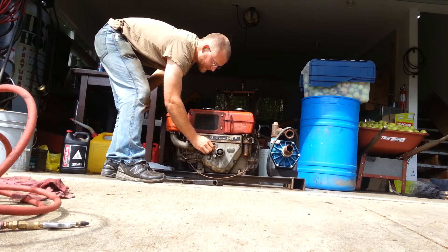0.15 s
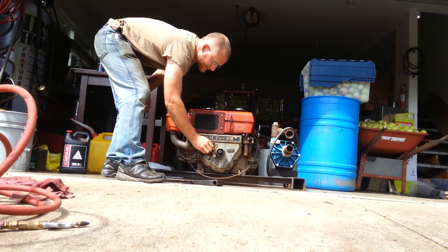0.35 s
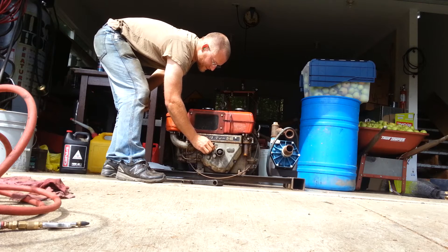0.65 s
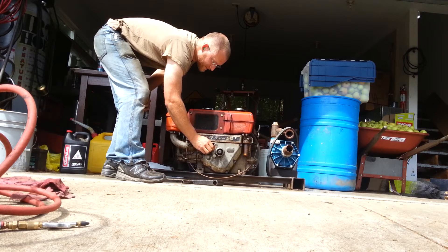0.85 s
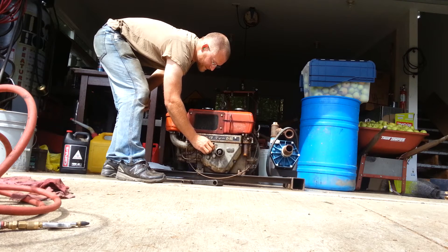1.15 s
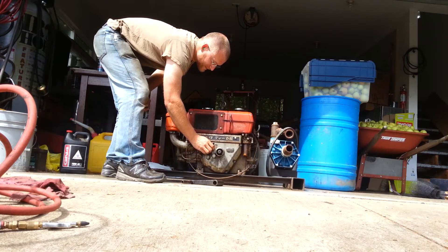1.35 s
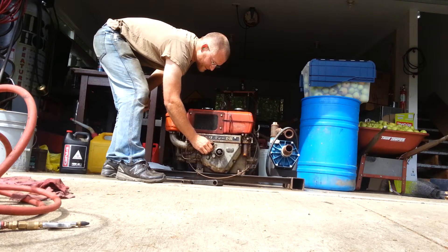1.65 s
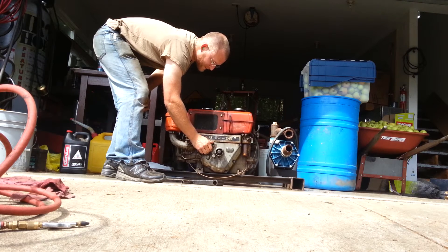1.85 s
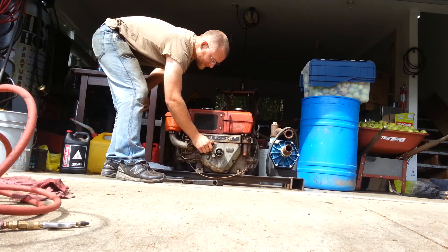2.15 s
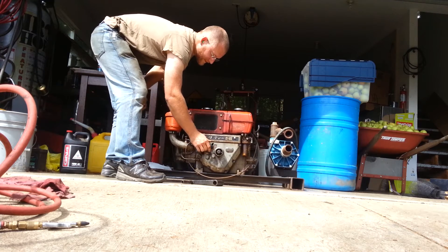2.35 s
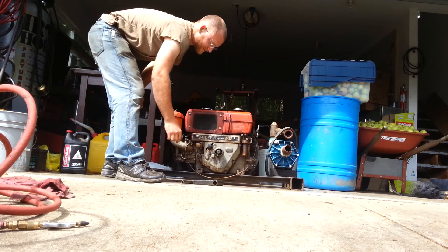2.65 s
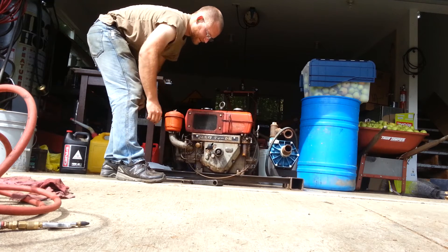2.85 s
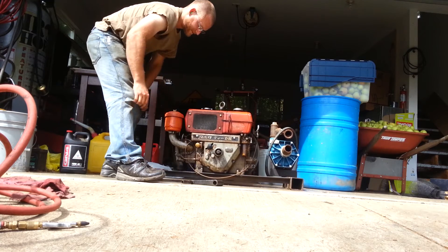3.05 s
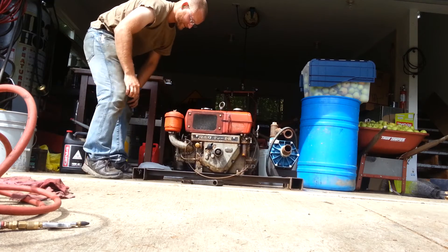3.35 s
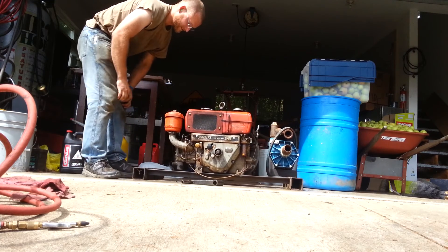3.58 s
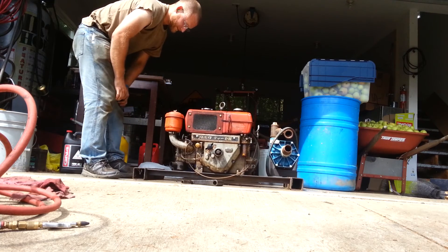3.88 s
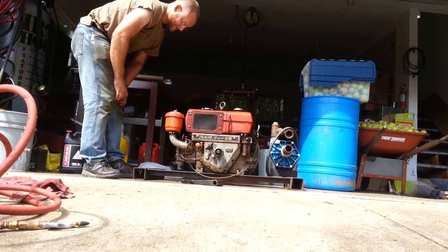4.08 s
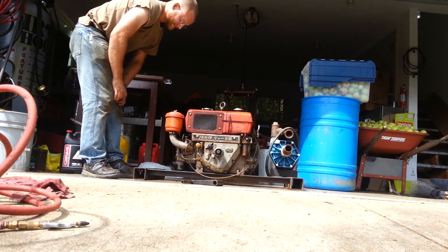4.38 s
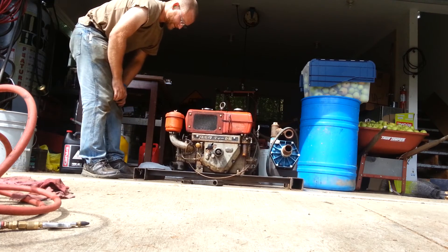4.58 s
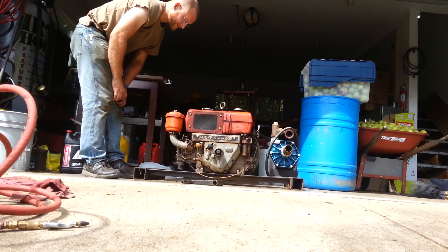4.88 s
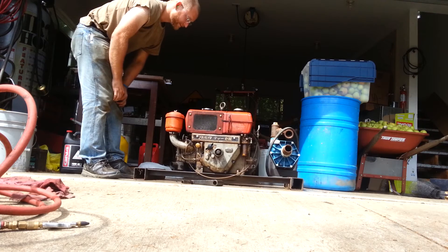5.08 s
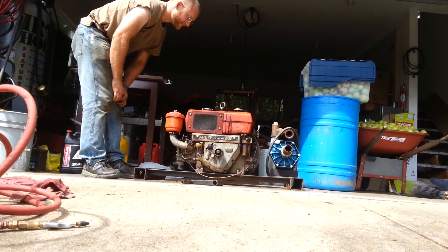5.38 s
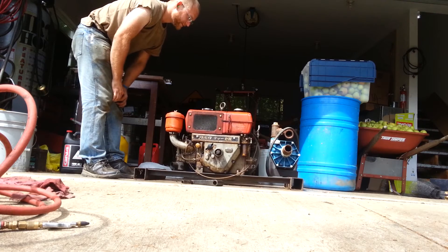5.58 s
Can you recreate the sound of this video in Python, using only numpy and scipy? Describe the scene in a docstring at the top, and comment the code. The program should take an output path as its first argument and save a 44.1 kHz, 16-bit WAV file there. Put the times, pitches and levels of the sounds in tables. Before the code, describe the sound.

An old single-cylinder diesel winds up in an open garage. After a brief churn of gears, the first firing comes almost at once; the opening two beats are weak, at roughly four and a half per second. By 0.5 s the strokes are strong: a dull, hard knock of the block, a hoarse low-mid exhaust blast, and a rough burst of steel skid and covers chattering. Between beats, gears churn, loose parts tick and the intake gives a small low gulp. The force dips near 1.2 s, surges around 1.7 s at about seven beats per second, and eases near 2.3 s. From about 2.7 s the exhaust pitch rises and the rattle grows longer and brighter, merging into a fast chug. After 3.8 s it eases slightly and runs steadily near nine beats per second to the end, around 5.7 s. Short garage reverberation, very faint wind, and overloaded, flattened peaks throughout.

```python
"""In an open garage, a one-cylinder diesel swung by a hand crank picks up from five to nine firings a second.
Each firing knocks the block, roars out of the exhaust and shakes the steel skid into chatter.
About half a cycle later the intake gulps; gears churn and loose parts tap in between.
The garage rings, faint wind rumbles outside, and the microphone overloads on the loud beats."""
import sys
import numpy as np
from scipy import signal
from scipy.fft import rfft, irfft
from scipy.io import wavfile

SR = 44100
rng = np.random.default_rng(int(sys.argv[2]) if len(sys.argv) > 2 else 0)


def unload_audio(sound):
    """Save the sound as a 16-bit wav file, at the path given as the first command line argument."""
    columns = np.transpose(np.atleast_2d(sound))
    # keep every value between -1 and 1, then stretch to whole-number steps
    steps = np.round(np.clip(columns, -1, 1) * 32767)
    wavfile.write(sys.argv[1], SR, steps.astype(np.int16))


N = 252252  # length of the scene [samples]
CYCLE = 10240  # room for the sound of one firing [samples]
AGE = np.arange(CYCLE) / SR  # time since a firing [s]
SIGN = np.array([[1], [-1]])  # left, right


# What the block rings with after the crack: (frequency [Hz], level [dB], time to fade by 60 dB [s])
BLOCK_MODES = [(403, -10, 0.032), (473, -15.5, 0.087), (688, -2, 0.037), (858, -10, 0.071),
               (1084, -6, 0.056), (1476, -18, 0.15), (1480, -47, 0.075)]
# Level of the knock: (level at the starting speed [dB], gain per extra firing a second [dB],
# added at full running [dB], gain per dB of force [dB/dB], added on the first stroke [dB], scatter [dB])
KNOCK_LEVEL = (-5, -.5, -3.5, .5, 3, 2.5)


def knocks():
    """Combustion strikes the block: a short crack, its echo, the ring of the casting and a thin tick."""
    out = np.zeros((2, N))
    crack = 0
    for at, db in [(.0013, -2.5), (.0088, -14.5)]:  # the crack, then its echo
        swell = np.exp(-.5 * ((AGE - at) / 0.00083) ** 2)
        crack = crack + undb(db) * swell * np.cos(2 * np.pi * 1450 * (AGE - at))

    push = signal.windows.hann(15)  # a blow this long softens the highest ringing
    block = signal.lfilter(push / push.sum(), 1, ring(BLOCK_MODES, CYCLE))
    # a small body radiates no bass
    block = signal.sosfilt(signal.butter(2, 260, "highpass", fs=SR, output="sos"), block)

    snap = np.exp(-AGE / .0045) * (1 - np.exp(-AGE / .0008))
    tick_spectrum = [(30, -35), (300, -39), (1500, -12), (3000, 6), (5500, -16.5),
                     (9000, -15.5), (13000, -20.0), (16000, -37)]  # (Hz, dB)
    for (s, _), grain in zip(firings(), cycles(memory=0.7)):
        blow = loudness(s, KNOCK_LEVEL)
        tick = snap * colour(grain, tick_spectrum)
        add(out, s, blow * undb(6.0) * crack)
        add(out, s + .0008, blow * tick)
        add(out, s + 0.00252, blow * block)
    return out


# Spectrum of the low roar: (frequency [Hz], level [dB per Hz])
ROAR_SPECTRUM = [(25, -16), (70, -25), (160, -31), (280, 0), (420, 3.5), (720, 6), (1100, 2.5), (2000, -29),
                 (5000, -22), (16000, -63)]
# Resonances of the exhaust's bark: (frequency [Hz], width [Hz], level [dB])
BARK_MODES = [(1092, 56, 7), (1470, 220, -24), (1622, 173, 17.5), (1880, 80, -45)]
# Levels of roar and bark: the same six columns and units as KNOCK_LEVEL
ROAR_LEVEL = (-11.5, 0.27, -1.8, .45, -5, 0.64)
BARK_LEVEL = (-17.8, 0.68, 5, 0.03, 4, 1.1)
PIPE_COLD_HZ, PIPE_HOT_HZ = 509, 629  # the pipe's pitch rises as it heats
PIPE_SCATTER = 0.042  # how far the pitch strays from beat to beat [share]
PIPE_WARM_S, PIPE_WARMING_S = 2.67, 0.16  # when it heats, and how quickly
VALVE_LAG_S = 0.003006  # the gas leaves a moment after the knock


def exhaust():
    """A blast of gas swells and fades in the pipe: a low roar and a bark above it, uneven from beat to beat."""
    out = np.zeros((2, N))
    swell = 1 - np.exp(-AGE / 0.0019)
    blast = swell / (1 + np.exp(np.minimum((AGE - .026) / 0.0053, 50)))
    blast_rms = np.sqrt(np.mean(blast ** 2))
    bark_spectrum = [(100, -11), (900, 5.5), (1800, -4.0), (2600, -9), (6000, -28), (16000, -50)]  # (Hz, dB)
    for (s, _), gas in zip(firings(), cycles(memory=0.66)):
        heat = .5 + .5 * np.tanh((s - PIPE_WARM_S) / PIPE_WARMING_S)
        pipe_hz = PIPE_COLD_HZ + heat * (PIPE_HOT_HZ - PIPE_COLD_HZ)
        pipe_hz = pipe_hz * (1 + PIPE_SCATTER * rng.standard_normal())
        roar = colour(gas, ROAR_SPECTRUM)
        roar = roar + undb(6) * resonate(roar, pipe_hz, 45)
        bark = sum(undb(db) * resonate(gas, hz, width) for hz, width, db in BARK_MODES)
        bark = colour(bark, bark_spectrum)
        for sound, law in (roar, ROAR_LEVEL), (bark, BARK_LEVEL):
            add(out, s + VALVE_LAG_S, loudness(s, law) * unit(sound * blast) * blast_rms)
    return out


# Spectra of the chatter while winding up and at full running: (frequency [Hz], level [dB per Hz])
CHATTER_SLOW_SPECTRUM = [(20, -54), (200, -4), (900, -3), (1600, -3.5), (2000, 3), (2450, 3), (3200, 7),
                         (3700, -4), (4700, -10.5), (5700, -32), (8500, -31), (12000, -62), (16000, -62)]
CHATTER_FAST_SPECTRUM = [(20, -77), (200, -4), (900, -6.5), (1600, -13), (2000, -3), (2450, 0.5), (3200, 5),
                         (3900, 1), (4700, -6), (5700, -17.5), (8500, -23), (12000, -36), (16000, -100)]
# Level of the chatter: the same six columns and units as KNOCK_LEVEL
CHATTER_LEVEL = (-7.5, 0.4364, -3, 1, -2.5, 1.15)
CHATTER_LAG_S, CHATTER_ANGLE = .0095, .066  # it peaks this lag plus this share of the cycle after the firing
CHATTER_SLOW_S, CHATTER_FAST_S = 0.0063, 0.0091  # half length of the burst, winding up and at full running
CHATTER_TAIL_DB, CHATTER_TAIL_LENGTHS = -12.5, 3.2  # last bounces: level, and decay in half lengths


def chatter():
    """Each firing sets skid and covers buzzing together; the burst grows longer and brighter with speed."""
    out = np.zeros((2, N))
    for (s, period), taps in zip(firings(), cycles(memory=0.82)):
        running = full_running(s)
        length = CHATTER_SLOW_S + running * (CHATTER_FAST_S - CHATTER_SLOW_S)
        t = (AGE - CHATTER_LAG_S - CHATTER_ANGLE * period) / length  # in half lengths from the peak
        bounces = undb(CHATTER_TAIL_DB) * np.exp(-np.maximum(t, 0) / CHATTER_TAIL_LENGTHS)
        onset = 1 / (1 + np.exp(np.minimum(-6 * (t + 1.3), 50)))  # sets in abruptly
        burst = np.maximum(np.exp(-.5 * t ** 2), bounces) * onset
        # the strength jumps at random every 64 samples
        taps = taps * undb(2.8 * np.repeat(rng.standard_normal(CYCLE // 64), 64))
        slow = unit(colour(taps, CHATTER_SLOW_SPECTRUM))
        fast = unit(colour(taps, CHATTER_FAST_SPECTRUM))
        buzz = (1 - running) * slow + running * fast
        add(out, s, loudness(s, CHATTER_LEVEL) * burst * buzz)
    return out


# What the skid and covers ring with: (frequency [Hz], level [dB], time to fade by 60 dB [s])
STEEL_MODES = [(414, -3, 0.05), (525.2, -5, 0.19), (642, -11, 0.037), (817, 1, 0.078), (890, -6.5, 0.25),
               (960, 0.5, 0.037), (1180, -12, 0.66), (1455, -10, 0.16), (1618, -3, 0.099),
               (2340, 2.5, 0.07), (2375, -8.5, 0.094), (2455, 6, 0.073), (2555, -4, 0.07), (2693, -4, 0.27),
               (2733, -6, 0.037), (3113, 0.5, 0.096), (3350, -11, 0.049), (3350, -18, 0.51),
               (3560, 3.5, 0.023), (3980, -10, 0.076), (3950, -1, 0.064), (4260, -10, 0.041),
               (4460, -4, 0.17), (4900, -13, 0.043)]


def steel(hits):
    """Skid and covers ring on in many decaying tones after whatever hits them."""
    return through(hits, ring(STEEL_MODES, 2 * CYCLE, scattered=True))


# Level of the intake: the same six columns and units as KNOCK_LEVEL
INTAKE_LEVEL = (-23.5, 2.5, 0.1, 0, -2.5, -0.7)
INTAKE_ANGLE = .535  # share of the cycle at which the intake gulps


def intake():
    """Once a cycle the intake gulps: a short low thump that falls in pitch."""
    out = np.zeros((2, N))
    for s, period in firings():
        t = np.clip(AGE - INTAKE_ANGLE * period, -.03, .03)
        hz = (185 + 50 * full_running(s)) * np.exp(-t / 0.037)
        hz = hz * (1 + 0.0427 * rng.standard_normal())
        gulp = np.exp(-.5 * (t / 0.0025) ** 2) * np.sin(2 * np.pi * np.cumsum(hz) / SR)
        add(out, s, loudness(s, INTAKE_LEVEL) * gulp)
    return out


# Spectrum of the gears: (frequency [Hz], level [dB per Hz])
GEAR_SPECTRUM = [(25, -27), (55, -15), (90, -1), (125, -9), (180, -4), (270, 6), (400, 4), (900, 3),
                 (1400, -3), (1950, -1), (2600, -1.5), (4600, -14), (5600, -32.5), (8700, -30.5),
                 (10500, -50.5), (16000, -62)]
# Levels of the gears and of the loose parts: the same six columns and units as KNOCK_LEVEL
GEAR_LEVEL = (-34.5, 3, 2, 0.42, 4, 4.5)
LOOSE_LEVEL = (-20.5, -0.8, 1.5, 0, -16, -1)
# the gears quieten as compression brakes the flywheel, from this share of the cycle on
COMPRESSION_DB, COMPRESSION_ANGLE = -6.5, 0.62


def gears():
    """Gears churn much alike in every cycle; tappets and loose parts tap at nearly the same crank angles."""
    t = np.arange(N) / SR
    # 18 taps spread over the last three quarters of the cycle
    angles = (np.arange(18) + rng.uniform(0, 1, size=18)) / 18 * .75 + .25
    teeth, taps = np.zeros((2, N)), np.zeros((2, N))
    add(teeth, 0, noise(int(FIRST_FIRING_S * SR)))  # churning before the first firing
    for (s, period), turn in zip(firings(), cycles(memory=0.91)):
        braking = undb(np.interp(AGE / period, [COMPRESSION_ANGLE, 1], [0, COMPRESSION_DB]))
        add(teeth, s, (turn * braking)[:, :int(period * SR)])
        for angle in angles:
            fade = undb(-12 * (angle - .5))  # the shaking dies down through the cycle
            tap = noise(512) * np.exp(-AGE[:512] / 0.0031) * fade
            at = s + period * (angle + .012 * rng.standard_normal())
            add(taps, at, tap * undb(3.0 * rng.standard_normal()))
    churn = unit(colour(teeth, GEAR_SPECTRUM))
    taps = colour(colour(taps, GEAR_SPECTRUM), [(40, -65), (300, 9.0), (600, 5), (16000, -6.0)])
    rattle = undb(-6.5) * unit(taps) + undb(-11.5) * unit(steel(taps))
    return churn * loudness(t, GEAR_LEVEL) + rattle * loudness(t, LOOSE_LEVEL)


# Colour of the garage's tail: (frequency [Hz], level [dB])
GARAGE_SPECTRUM = [(25, -21), (60, -5), (90, 7.5), (170, 10), (500, -6.5), (850, 5.5), (1350, -3.5),
                   (1900, -6), (2400, 0), (3200, -3), (4500, 3), (5700, 7), (8000, 3), (11000, -3.5),
                   (16000, -17)]
# How long the tail lasts: (frequency [Hz], time to fade by 60 dB [s])
GARAGE_T60 = [(100, 0.36), (400, 0.43), (1000, 0.38), (2800, 0.67), (7000, 0.37), (14000, 0.16)]
# Low resonances of the garage: (frequency [Hz], level [dB], time to fade by 60 dB [s])
BOOM_MODES = [(93.5, -18, 0.63), (111, -21, 0.72), (162.6, -35, 0.58), (195.2, 11, 0.89), (292.6, 5, 0.54)]


def garage(x):
    """Walls and clutter return a dense tail, shortest in the highest treble, and a low boom."""
    t = np.arange(SR // 2) / SR
    spectrum = rfft(noise(len(t)))
    centres = np.geomspace(60, 15360, num=9)
    tail = 0
    for hz, one in zip(centres, np.eye(len(centres))):  # nine overlapping bands, each with its own decay
        band = irfft(spectrum * read(np.c_[centres, one], bins(t)), len(t))
        tail = tail + band * np.exp(-np.log(1000) * t / read(GARAGE_T60, hz))
    tail = colour(tail, GARAGE_SPECTRUM) * (1 - np.exp(-(t / 0.012) ** 2))  # builds up gradually
    return undb(-9.0) * through(x, tail) + undb(-30.5) * through(x, ring(BOOM_MODES, len(t)))


# Faint wind outside the door, a low rumble: (frequency [Hz], level [dB per Hz])
WIND_SPECTRUM = [(20, 8), (50, -31), (90, -6), (200, -10), (1000, -16), (16000, -30)]


def wind():
    """Faint wind outside the door: a low rumble of shaped noise, unrelated at the two ears."""
    return undb(-58) * unit(colour(rng.standard_normal((2, N)), WIND_SPECTRUM))


# The engine winds up and levels off: (time [s], speed [firings per second])
SPEED = [(0, 4.55), (.4, 5.025), (1.2, 6.174), (2, 7.145), (2.5, 7.609), (3, 8.068), (3.8, 8.544),
         (4.3, 8.693), (5, 8.839), (5.7, 8.914)]


def speed(s):
    """Firings a second at a time, read off the speed table."""
    return np.interp(s, *np.transpose(SPEED))


FIRST_FIRING_S = .037


def firings():
    """Time and period of every cycle: each firing follows the last by one period of the engine's speed."""
    s = FIRST_FIRING_S
    while s < N / SR:
        yield s, 1 / speed(s)
        s = s + 1 / speed(s)


# firing rate around which the sound turns into the steady chug
FULL_RUNNING_HZ, FULL_RUNNING_SPREAD_HZ = 8.15, .22


def full_running(s):
    """Share of the steady chug, 0-1: it sets in as the engine nears its governed speed."""
    return .5 + .5 * np.tanh((speed(s) - FULL_RUNNING_HZ) / (2 * FULL_RUNNING_SPREAD_HZ))


# Force of the combustion: two weak opening strokes, then two surges, then the governor cuts the fuel back:
# (time [s], level [dB])
FORCE = [(.04, -7.5), (.25, -5), (.48, -0.8), (1.0, 0.5), (1.25, -2.5), (1.72, 5), (2.25, -3.5),
         (2.75, 1.3), (3.5, 2.3), (3.8, -1), (5.7, -2.2)]
FIRST_STROKE_S = 0.094  # how long the cold first stroke stands apart


def loudness(s, law):
    """Gain of a part from the engine's speed and force, with one random change in level for each call."""
    db, per_speed, running_db, per_force, first_db, scatter_db = law
    force = np.interp(s, *np.transpose(FORCE))
    first = np.exp(-((s - FIRST_FIRING_S) / FIRST_STROKE_S) ** 2)
    steady = db + per_speed * (speed(s) - speed(0)) + running_db * full_running(s)
    return undb(steady + per_force * force + first_db * first + scatter_db * rng.standard_normal())


def cycles(memory):
    """Noise for each firing that partly repeats the last one: the same parts move in the same order."""
    keep, now = np.clip(memory, 0, .98), noise(CYCLE)
    for _ in firings():
        now = keep * now + np.sqrt(1 - keep ** 2) * noise(CYCLE)
        yield now


def undb(db):
    """Decibels to gain."""
    return 10 ** (np.asarray(db) / 20)


def unit(x):
    """Scale to an average (rms) level of 1."""
    return x / np.sqrt(np.mean(x ** 2))


def read(points, hz):
    """Read a table of (Hz, value), joined by lines on a log-frequency axis."""
    f, value = np.transpose(points)
    return np.interp(np.log(np.maximum(hz, 1)), np.log(f), value)


def bins(x):
    """The frequencies of a signal's spectrum."""
    return np.fft.rfftfreq(x.shape[-1], 1 / SR)


def colour(x, points):
    """Filter a signal by a table of (Hz, dB)."""
    return irfft(rfft(x) * undb(read(points, bins(x))), x.shape[-1])


def resonate(x, hz, width_hz):
    """Pass a signal through one resonance, gain 1 at its centre."""
    f = bins(x)
    response = 1j * f * width_hz / (hz ** 2 - f ** 2 + 1j * f * width_hz)
    return irfft(rfft(x) * response, x.shape[-1])


# How different left and right are: (frequency [Hz], side level minus mid level [dB])
WIDTH = [(30, -18), (70, -19), (150, -23), (300, -19), (550, -19), (1000, -9.5), (2000, -0.5),
         (16000, -5.5)]


def widen(pair):
    """Two unrelated signals as left and right: alike in the bass, apart in the treble."""
    side = undb(read(WIDTH, bins(pair)))
    spectrum = rfft(pair)
    return irfft((spectrum[0] + SIGN * side * spectrum[1]) / np.sqrt(1 + side ** 2), pair.shape[-1])


def noise(size):
    """White stereo noise."""
    return widen(rng.standard_normal((2, size)))


def ring(modes, size, scattered=False):
    """Decaying tones; if scattered, the higher ones reach the two ears out of step, as from many faces."""
    t, out = np.arange(size) / SR, 0
    for hz, db, t60 in modes:
        shared = rng.uniform(0, 2 * np.pi)
        apart = SIGN * rng.uniform(-1.53, 1) * np.pi / 2 * undb(read(WIDTH, hz))
        phase = scattered * (shared + apart)
        out = out + undb(db) * np.sin(2 * np.pi * hz * t + phase) * np.exp(-np.log(1000) * t / t60)
    return out


def through(x, response):
    """Pass a signal through a response of unit energy."""
    return signal.fftconvolve(x, unit(response) / np.sqrt(response.shape[-1]), axes=-1)[:, :N]


def add(out, s, sound):
    """Mix a sound in at a time [s]."""
    i = max(int(s * SR), 0)
    n = max(min(sound.shape[-1], N - i), 0)
    out[:, i:i + n] += sound[..., :n]


def scene():
    """The engine with its chatter a little to the right; every beat leaves the steel and garage ringing."""
    blows = knocks() + exhaust()
    buzz = chatter() * undb(-.8 * SIGN)
    ringing = undb(-10.5) * steel(undb(-1) * blows + buzz)
    engine = blows + buzz + ringing + intake() + gears()
    return engine + garage(engine) + wind()


TOP_HZ = 15000


def record(dry):
    """The microphone channel flattens loud peaks, thins the deep bass and cuts the top."""
    driven = dry * undb(1)
    clipped = driven / (1 + driven ** 10) ** (1 / 10)
    thinned = signal.sosfilt(signal.butter(1, 40, "highpass", fs=SR, output="sos"), clipped)
    return signal.sosfilt(signal.ellip(8, .2, 70, TOP_HZ, fs=SR, output="sos"), thinned)


dry = scene()
out = record(dry)
unload_audio(out)
```